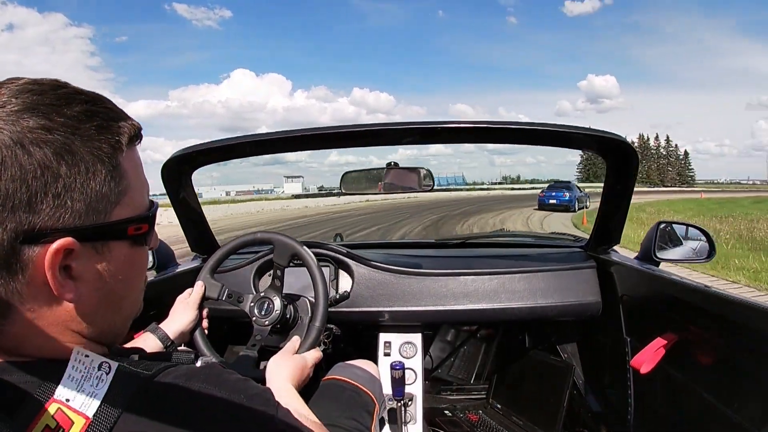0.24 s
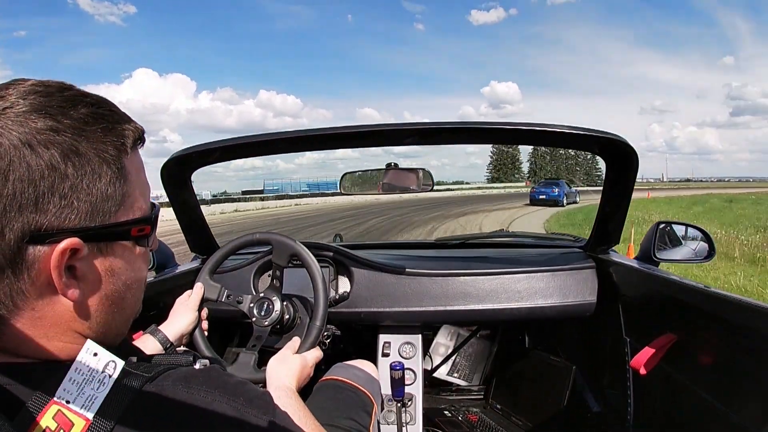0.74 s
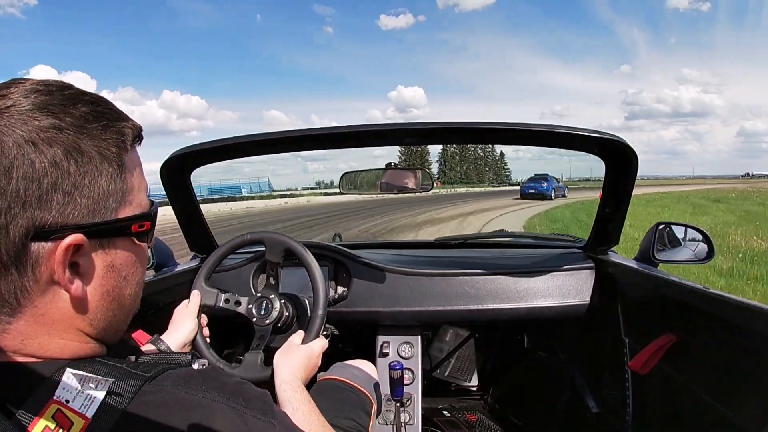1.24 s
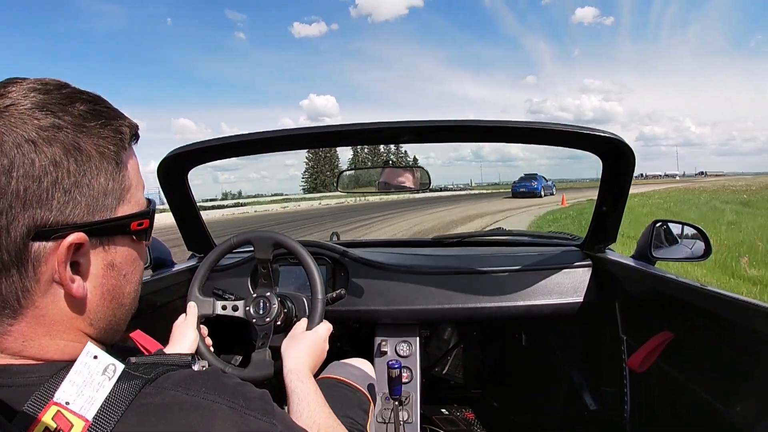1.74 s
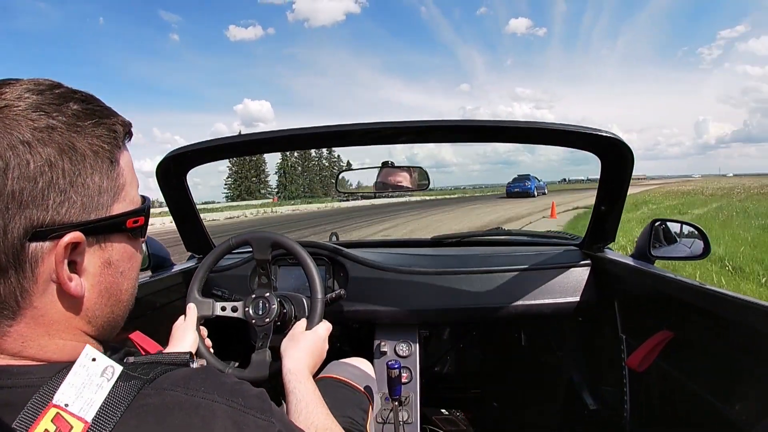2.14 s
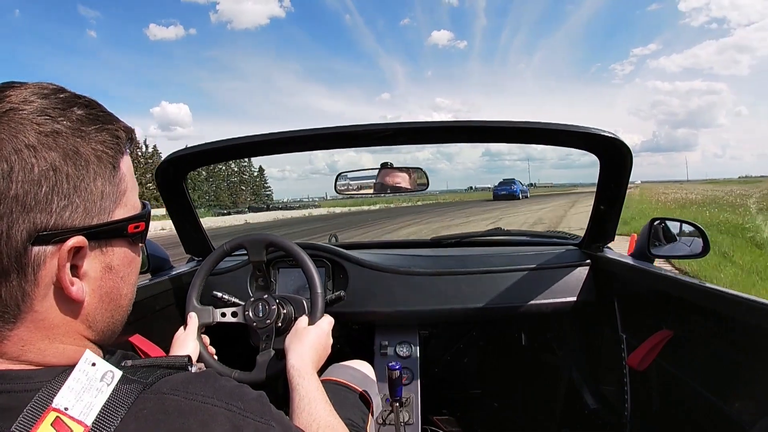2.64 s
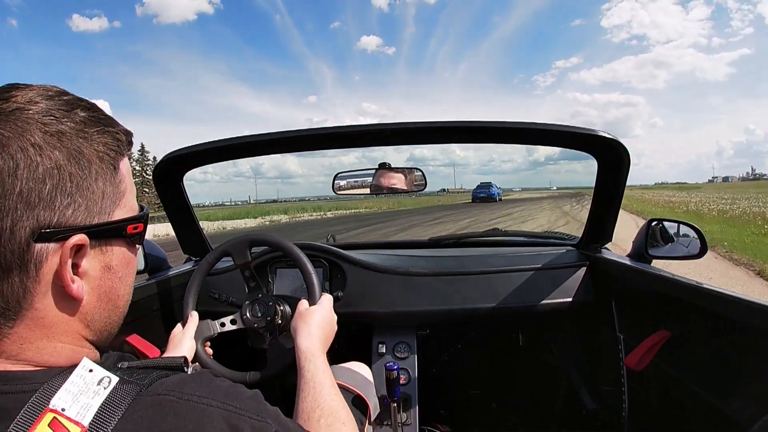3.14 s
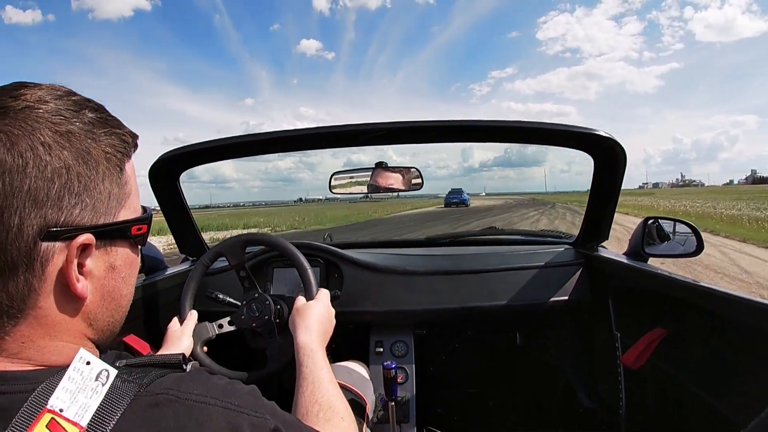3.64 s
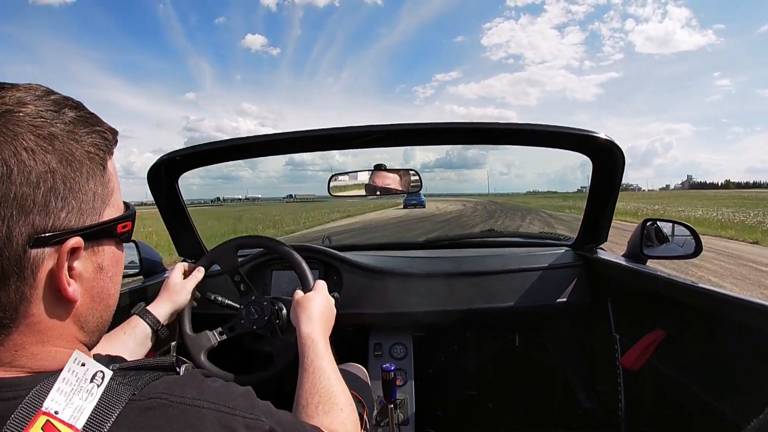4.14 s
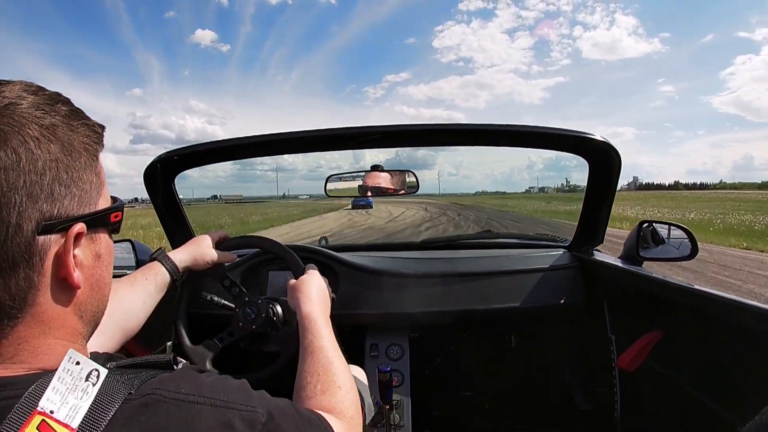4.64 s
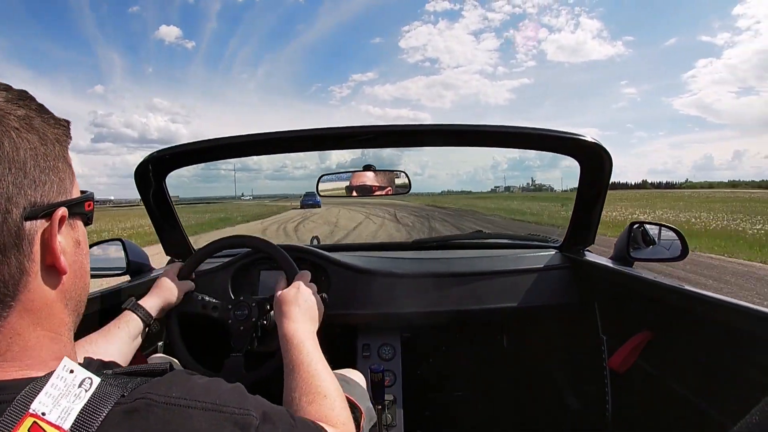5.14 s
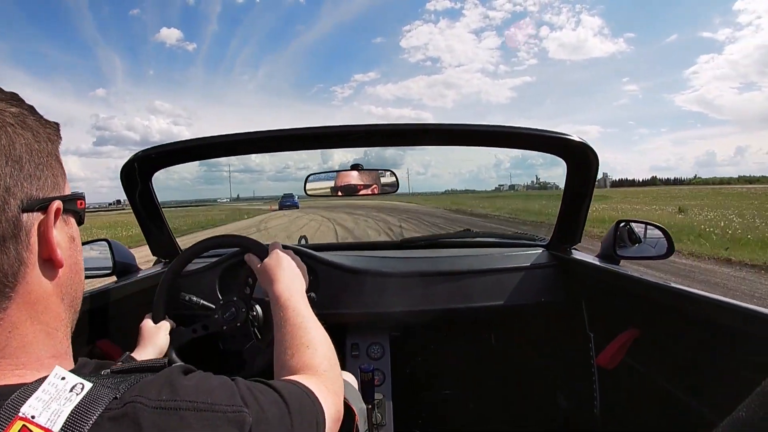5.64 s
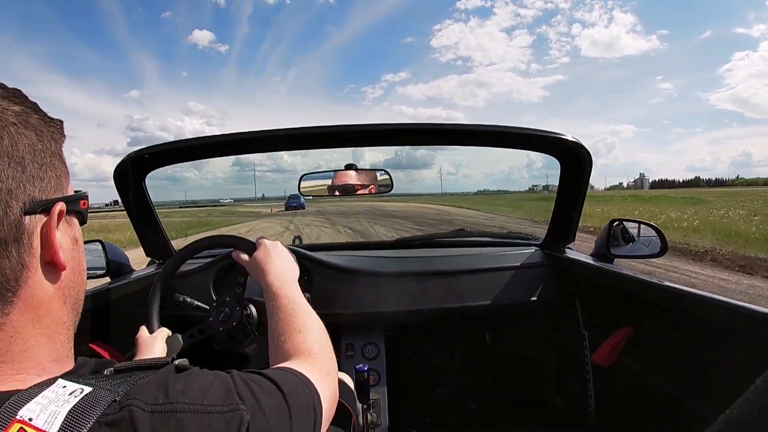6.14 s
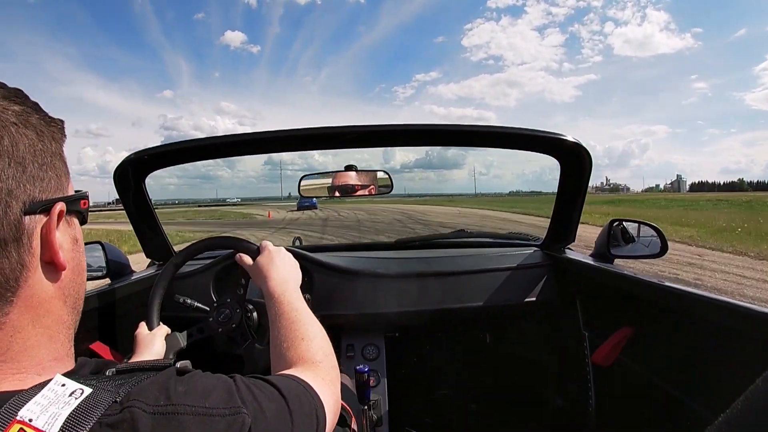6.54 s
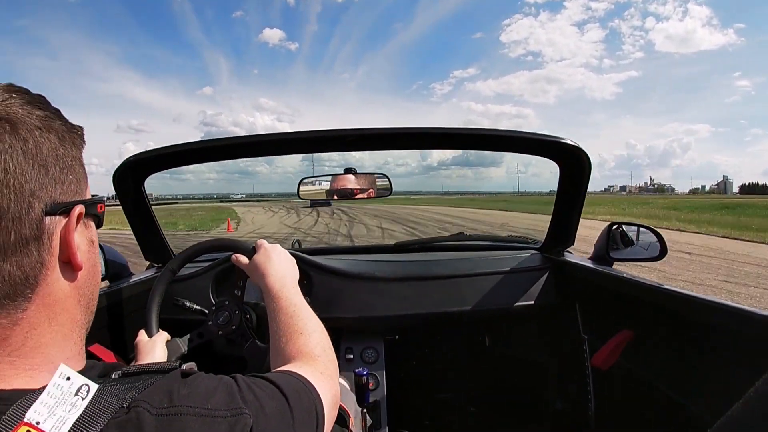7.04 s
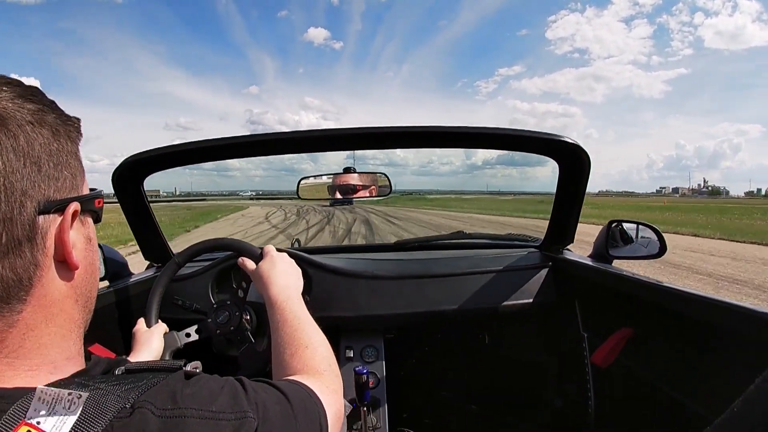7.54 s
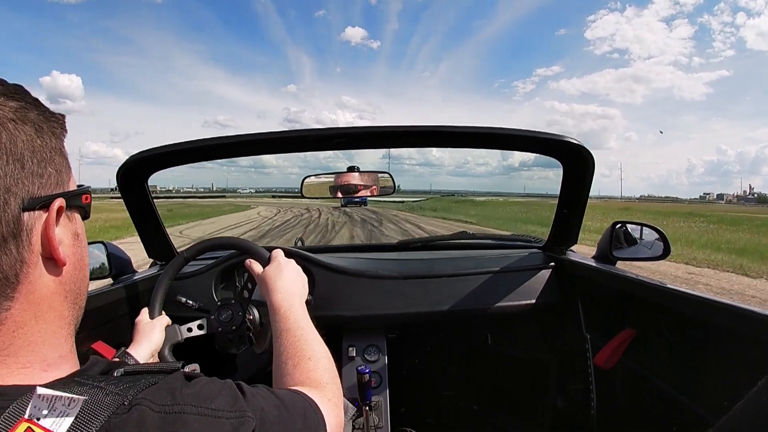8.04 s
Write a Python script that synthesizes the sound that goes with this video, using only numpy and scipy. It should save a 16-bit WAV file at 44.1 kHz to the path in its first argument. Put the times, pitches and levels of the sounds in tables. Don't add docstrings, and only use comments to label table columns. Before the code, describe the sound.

From an open cockpit, a raspy engine note rises for seven seconds, then cuts into a venting hiss, misfires, crackling pops and wind slaps.

```python
import sys
import numpy as np
from scipy import signal
from scipy.io import wavfile
from scipy.ndimage import uniform_filter1d, minimum_filter1d

SR = 44100
rng = np.random.default_rng(int(sys.argv[2]) if len(sys.argv) > 2 else 0)


def how_loud(loudness_db):
    steps = np.asarray(loudness_db, float) / 20
    return 10 ** steps


def digitize_waveform(pressure):
    field = np.atleast_2d(pressure).T
    bounded = np.clip(field, -1, 1)
    quanta = np.round(bounded * 32767).astype(np.int16)
    wavfile.write(sys.argv[1], SR, quanta)


N = 365588

# t/s, firing rate/Hz
SPEED = [(0, 54.5), (.36, 55.9), (.95, 58), (2.18, 63.6), (2.64, 65.9), (3.43, 70.2), (3.97, 73.4),
         (4.78, 79), (5.38, 83.8), (6.06, 90.3), (6.64, 95.3), (6.9, 97)]
CUT_S, COAST_LOSS_PER_S2 = 6.97, 10.5
SHUNT_HZ, SHUNT_PER_S, SHUNT_DECAY_S, SHUNT_TOP_S = 7.5, .6, .5, .13
# t/s, level/dB
EFFORT = [(0, -14), (.12, -18.5), (.18, -23.5), (.5, -16), (1.04, -19), (1.1, -19.5), (1.5, -19),
          (1.85, -16.5), (2.6, -14), (6.97, -12.5)]
FULL_DB = -14

# f/Hz, level/dB
FIRST_ORDER = [(54, -17), (62, -16.5), (75, -15), (97, -12.5)]
SECOND_ORDER = [(108, -18), (135, -15.5), (148, -20), (157, -28), (172, -20.5), (184, -19), (195, -19.5)]
THIRD_ORDER = [(160, -37), (180, -36.5), (190, -49.5), (200, -52)]
# f/Hz, lag/turns
SECOND_TRAIL = [(150, .225), (165, .14), (185, .18)]
CABIN_DELAY_S, FIRST_LEAD, THIRD_LEAD = .0068, .416, 0.18
CABIN_MODE_HZ, CABIN_MODE_LEAD = 60.7, .085
BOOM_FOLLOWS = 0.073
COAST_FIRST_DB, COAST_SECOND_DB, REOPEN_S = -22.5, -53, 0.27

# f/Hz, width/Hz, level/dB
BARK = [(225.3, 40, 0), (292, 18, -10), (326, 58, 13), (398.5, 68, 17.5), (456, 17, 8.5)]
# f/Hz, width/Hz, level/dB
SILENCER_DIPS = [(244, 5.8, -5), (193.5, 13, -6.5)]
# f/Hz, width/Hz, level/dB
COLD_DIP = [(441, 110, 0.0084)]
COLD_SHARE, WARM_HZ = 0.42, 74.8
COLD_HZ, HOT_HZ = 64, 85.4
# f/Hz, width/Hz, level/dB, slope/dB per firing rate Hz, extra slope once hot
RASP = [(560, 110, -9, -0.32, 0), (604, 88, -1.5, 0.35, -0.11), (663, 33, 6.5, 0.17, 0.063),
        (702, 37, -5.5, -0.46, 0.029)]
RING = [(844.4, 78, 4.5, 0.12, .35), (954.7, 77, 1.5, 0.1, 0.4), (1048, 31, -8.5, .1, -0.3),
        (1187, 110, -2.5, 0.17, -0.2), (1592, 150, -9, -0.018, .1), (1902, 26, -12.5, -0.1, .05)]
# firing rate/Hz, level/dB
RASP_TUNING = [(55, -24.5), (60, -25), (66, -30), (73, -33), (77, -31.5), (82, -29.5), (88, -28), (97, -31)]
# f/Hz, width/Hz, level of the cancelling path/dB
CANCELLED = [(755, 58, -3), (872, 13, -8.5), (1103, 41, -7.5), (1339, 170, 3)]
BARK_HZ, RASP_HZ, MICROPHONE_HZ = (202, 474.4), (475, 1730), 6210
UPPER_HZ = (800, 1280, 2300)
RING_DB, RING_DB_PER_HZ = -27.5, -0.33
TOP_DB, TOP_DB_PER_HZ, TOP_BEST_HZ = -40.5, -0.2921, 75
RING_FOLLOWS_FLOW = 0.32
WANDER_DB = 0.64
SCATTER_S, SCATTER_SHARE = (.0011, .0019), .5
EDGE_LEAD_S = .0028

# t/s, f/Hz
TURBO = [(0, 2100), (.55, 2400), (1, 2880), (2, 3715), (2.5, 4040), (3, 4465), (4, 5235), (5, 6130),
         (5.5, 6545), (6, 6865), (6.25, 6995), (6.6, 7060), (6.98, 7090)]
RUNDOWN_HZ, RUNDOWN_PER_S = 7050, .7
# f/Hz, level/dB
WHISTLE = [(2100, -80), (2900, -60), (3700, -60), (4100, -66), (4450, -62), (4900, -65), (5700, -64),
           (6500, -66), (6950, -63), (7100, -70)]
SHUT_WHISTLE = [(2900, -66), (3300, -60), (3700, -53), (4100, -59), (4900, -58), (5500, -53), (6000, -51),
                (7000, -53)]

# t/s, level/dB
FLOW = [(0, -61), (1.7, -48), (2.7, -53.5), (4, -54), (5.5, -49.5), (6.9, -51.5), (7, -56), (7.6, -53.5),
        (8.29, -52)]
# f/Hz, level/dB
HISS = [(900, -22), (1400, -8), (1650, 7), (2300, -14.5), (2900, -8), (3600, -9), (4300, -22.5), (5800, -4),
        (6600, -19), (7800, -24), (9000, -17), (11000, -23.5)]
# f/Hz, width/Hz, level/dB
DUCT = [(2880, 330, 0), (3570, 360, 1.5), (4270, 200, -6)]
SHUT_DUCT = [(3080, 490, 7)]
# f/Hz, width/Hz, level/dB
SEALS = [(3590, 300, -.5), (7400, 550, -16.5), (8500, 600, -22.5)]
SEAL_DB, SEAL_DB_PER_HZ = -59, -0.1858
RUSH_DB, RUSH_RISE_S, RUSH_FADE_DB_PER_S = -37.5, 0.23, 5.5
SLIPSTREAM_DB = -67

# t/s, peak level/dB
GUSTS = [(0.093, -16.5), (0.324, -26), (0.715, -32), (1.008, -24), (1.107, -24.5), (1.236, -26),
         (1.37, -25), (1.587, -22.5), (2.048, -26), (2.138, -25), (2.433, -35), (4.593, -32), (4.914, -32),
         (5.065, -30), (5.219, -22), (6.064, -20.5), (6.191, -26), (6.575, -24), (6.722, -22), (6.817, -25),
         (6.992, -27), (7.12, -17.5), (7.209, -25), (7.35, -24), (7.42, -22.5), (7.514, -19.5),
         (7.669, -18), (7.802, -16.5), (8.008, -17.5), (8.189, -19)]
# t/s, level/dB
LULL = [(0, -28), (1.6, -38), (2.6, -33.5), (4, -34.5), (5, -29), (6.9, -37), (7.05, -29), (8.29, -26.5)]
# f/Hz, level/dB per Hz
WIND = [(12, -24), (22, -3), (50, -2), (100, -2), (250, -8), (400, -17), (700, -27), (1500, -44),
        (2500, -58)]
GUST_RISE_S, GUST_FALL_S, GUST_DB = 0.017, 0.06, -6
# t/s, peak level/dB, brightness/dB, t60/s
SLAPS = [(0.077, -6, -33, 0.063), (0.255, -13, -30, 0.063), (0.775, -24, -27, 0.04), (3.17, -14, -31, 0.11),
         (1.049, -23, -16, 0.024), (7.41, -21, -6.5, 0.073), (7.438, -4, -26, 0.017),
         (7.482, -13, -26, 0.035), (7.546, -9, -27, 0.059), (7.562, -14, -12, 0.029),
         (7.573, -9, -38, 0.049), (7.653, -9, -32, 0.04), (7.672, -2, -21, 0.038), (7.727, -15, -14, 0.2),
         (7.785, -16, -14, 0.043), (7.75, -28, -38, 0.12), (7.869, -16, -30, 0.11),
         (7.979, -12, -14, 0.064), (8.012, -11.5, -10, 0.03), (8.06, -24, -4, 0.048),
         (8.034, -17, -32, 0.025), (8.085, -7, -23, 0.054), (8.141, 1.5, -40, 0.024),
         (8.235, -29, -13, 0.073)]

TICK = (1.73, -31)
# f/Hz, width/Hz, level/dB
GRIT_MODES = [(4570, 370, -3), (5530, 280, 6), (8000, 160, 7), (9200, 500, -2)]

HIGH_STARTS_HZ, HIGH_ENDS_S, HIGH_BAND_HZ = 4400, 7.57, (12000, 14300)
HIGH_DB, HIGH_BURST_DB, HIGH_BURST_S = -56, -36, .05
LURCH_DB, LURCH_S = -22, 0.27

# f/Hz, level/dB
VENT_HISS = [(2000, -31), (2800, 7), (4500, 5.5), (5800, -5.5), (7200, 4), (9000, -4.5), (11000, -26),
             (13000, -28), (14500, -6)]
VENT_S = 7.026
VENT_HOLD_S, VENT_DB, VENT_FADE_DB_PER_S, CRACK_DB = 0.35, -44, 49, -44.5

# t/s, peak level/dB
MISFIRES = [(6.98, -4.5), (7.001, -7), (7.052, -22), (7.086, -6.5), (7.126, -5.5), (7.145, -4.5),
            (7.167, -9), (7.177, -6), (7.187, -11), (7.209, -7.5), (7.219, -12), (7.242, -13.5),
            (7.252, -26), (7.264, -16), (7.287, -16.5), (7.327, -37)]
# t/s, peak level/dB, half-width/ms, push (+) or pull (-)
POPS = [(7.304, -5, 0.99, 0.73), (7.451, -2, 0.68, 0.29), (7.562, -11, 1.2, -1), (7.574, -1.5, 0.84, 0.96),
        (7.578, -5, 0.83, 0.92), (7.583, -11, 0.43, 1), (7.665, -9, 0.74, 0.83), (7.691, -5, 0.71, 0.34),
        (7.696, -9, 0.61, -1.1), (7.724, -5, 1.1, 0.84), (7.751, -10, 0.7, -1), (7.788, -10, 0.36, 0.84),
        (7.805, -7.5, 0.72, -1), (7.878, -5, 0.53, 0.82), (8.034, -4.5, 0.89, 0.79), (8.048, -9, 0.4, 0.92),
        (8.1, -5, 0.85, 0.79), (8.139, -1.5, 0.52, 0.82), (8.145, -12, 0.42, 0.55), (8.186, -12, 1.1, 0.23),
        (8.186, -2.5, 0.97, -1), (8.244, -23, 0.81, -0.87), (8.252, -12, 0.97, 0.97)]
CRACKLE_DB = -16
# t/s, peak level/dB
BURBLES = [(7.364, -23), (7.429, -18.5), (7.466, -30), (7.485, -23), (7.517, -29), (7.538, -24),
           (7.556, -20), (7.576, -18), (7.615, -33), (7.64, -27), (7.673, -21), (7.718, -17), (7.745, -19),
           (7.8, -20), (7.825, -24), (7.844, -30), (7.874, -28), (7.956, -20), (8.029, -23), (8.095, -22.5),
           (8.142, -27), (8.167, -25)]
# f/Hz, width/Hz, level/dB
BURBLE_MODES = [(620, 100, 2), (886, 200, 5), (1200, 360, -9)]
BURBLE_DB = -8

CEILING, LIMIT_S = .88, .006


def rms_one(x):
    return x / np.sqrt(np.mean(x ** 2) + 1e-20)


def evened(x, span_s=.5):
    return x / np.sqrt(uniform_filter1d(x ** 2, int(span_s * SR)) + 1e-12)


def in_time(rows):
    s, *columns = np.transpose(rows)
    return [np.interp(np.arange(N) / SR, s, c) for c in columns]


def at_hz(points, hz):
    return np.interp(hz, *np.transpose(points))


def lowpass_3(x, corner_hz, kind="low"):
    return signal.sosfilt(signal.butter(3, corner_hz, kind, fs=SR, output="sos"), x)


def band(x, low_hz, high_hz):
    return signal.sosfilt(signal.butter(2, [low_hz, high_hz], "band", fs=SR, output="sos"), x)


def drift(rate):
    r = np.exp(-40 * np.pi * rate / SR)
    white = rng.standard_normal(N // 20 + 2002)
    slow = signal.lfilter([1], [1, -2 * r, r * r], white)[2000:]
    return np.interp(np.arange(N) / 20, np.arange(len(slow)), rms_one(slow))


def clicks(times, sizes):
    out = np.zeros(N + 2)
    at = np.clip(np.asarray(times) * SR, 0, N)
    np.add.at(out, at.astype(int), sizes * (1 - at % 1))
    np.add.at(out, at.astype(int) + 1, sizes * (at % 1))
    return out[:N]


def clock():
    t = np.arange(N) / SR
    return t, np.maximum(t - CUT_S, 0)


def shaft():
    t, since = clock()
    shunt = SHUNT_PER_S * np.exp(-t / SHUNT_DECAY_S) * np.cos(2 * np.pi * SHUNT_HZ * (t - SHUNT_TOP_S))
    return in_time(SPEED)[0] + shunt - COAST_LOSS_PER_S2 * since


def spool_hz():
    since = clock()[1]
    return np.where(since > 0, RUNDOWN_HZ * np.exp(-RUNDOWN_PER_S * since), in_time(TURBO)[0])


def resonate(x, modes, wander_db=0.):
    out = 0
    faster = shaft() - 70 if wander_db else 0
    for hz, width, level_db, *slope_db in modes:
        r = np.exp(-np.pi * width / SR)
        if wander_db:
            hotter = np.maximum(faster + 70 - HOT_HZ, 0)
            level_db = level_db + slope_db[0] * faster + slope_db[1] * hotter + wander_db * drift(1.7)
        poles = [1, -2 * r * np.cos(2 * np.pi * hz / SR), r * r]
        out = out + how_loud(level_db) * signal.lfilter([1 - r, 0, r - 1], poles, x + 1e-18)
    return out


def coloured(spectrum, patchy_db, flicker):
    hz, level_db = np.transpose(spectrum)
    out, together, white = 0, drift(flicker), rng.standard_normal((2, N))
    count = int(2.5 * np.log2(hz[-1] / hz[1])) + 2
    edges = np.geomspace(max(hz[1] * .7, 14), min(hz[-1], 15500), count)
    for k, (low, high) in enumerate(zip(edges, edges[1:])):
        at_db = np.interp(np.log(low * high) / 2, np.log(hz), level_db)
        swell_db = patchy_db * (together + .5 * drift(flicker))
        out = out + how_loud(at_db + swell_db) * band(white[k % 2], low, high)
    return rms_one(out)


def scattered(x):
    for lag_s in SCATTER_S:
        taps = np.zeros(int(lag_s * SR) + 1)
        taps[[0, -1]] = 1, -SCATTER_SHARE
        x = signal.lfilter(taps[::-1], taps, x + 1e-18)
    return x


def bark_of(pulses):
    stored = signal.lfilter([1], [1, -.995], pulses)
    heat = np.clip((shaft() - COLD_HZ) / (HOT_HZ - COLD_HZ), -.1, 1.2)
    rung = resonate(stored, BARK[:-1]) + heat * resonate(stored, BARK[-1:])
    rung = rung - np.clip((WARM_HZ - shaft()) / 10, 0, COLD_SHARE) * resonate(rung, COLD_DIP)
    for dip in SILENCER_DIPS:
        rung = rung - resonate(rung, [dip])
    return signal.sosfilt(signal.ellip(3, 1, 45, BARK_HZ, "band", fs=SR, output="sos"), rung)


def rasp_of(pulses, *levels_db):
    soft = lowpass_3(pulses, 1900)
    rung = 0
    for level_db, modes, top_hz in zip(levels_db, (RASP, RING[:4], RING[4:]), UPPER_HZ):
        part = band(resonate(soft, modes, WANDER_DB), *RASP_HZ)
        rung = rung + how_loud(level_db) * rms_one(band(part, 550, top_hz))
    for dip in CANCELLED:
        rung = rung - resonate(rung, [dip])
    return rung


def pipe_levels():
    effort_db, per_s = in_time(EFFORT)[0] - FULL_DB, shaft()
    flow_db = RING_FOLLOWS_FLOW * (in_time(FLOW)[0] + 53)
    rasp_db = 0.17 * effort_db + at_hz(RASP_TUNING, per_s)
    ring_db = RING_DB + 0.12 * effort_db + flow_db + RING_DB_PER_HZ * (per_s - 70)
    return rasp_db, ring_db, TOP_DB + TOP_DB_PER_HZ * np.abs(per_s - TOP_BEST_HZ)


def cabin_boom(turns):
    per_s, since = shaft(), clock()[1]
    fade = np.clip(1 - since / 0.048, 0, 1)
    reopen = np.clip(since / REOPEN_S - .3, 0, 1)
    load = how_loud(BOOM_FOLLOWS * (in_time(EFFORT)[0] - FULL_DB)) * fade
    first = load * how_loud(at_hz(FIRST_ORDER, per_s)) + reopen * how_loud(COAST_FIRST_DB)
    second = load * how_loud(at_hz(SECOND_ORDER, 2 * per_s)) + reopen * how_loud(COAST_SECOND_DB - 10.0 * since)
    third = load * how_loud(at_hz(THIRD_ORDER, 3 * per_s))
    early = CABIN_MODE_LEAD / (1 + np.exp((per_s - CABIN_MODE_HZ) / 1.6))
    late = turns - CABIN_DELAY_S * per_s + FIRST_LEAD + early
    boom = first * np.cos(2 * np.pi * late)
    boom = boom + second * np.cos(4 * np.pi * (late - at_hz(SECOND_TRAIL, 2 * per_s)))
    return np.sqrt(2) * (boom + third * np.cos(6 * np.pi * (late - THIRD_LEAD)))


def engine(sharpness=14.4, uneven_db=0.58, jitter_s=.00004):
    t = clock()[0]
    lit = np.clip((CUT_S - t) / .004, 0, 1)
    turns = .9 + np.cumsum(shaft() + .3 * drift(5)) / SR
    luck = rng.standard_normal((700, 3))
    shape = np.exp(sharpness * (np.cos(2 * np.pi * turns) - 1))
    puffs = how_loud(uneven_db * luck[np.round(turns).astype(int), 0]) * shape
    count = np.arange(1, int(turns[-1]))
    edge_s = np.interp(count, turns, t) - EDGE_LEAD_S + jitter_s * luck[count, 1]
    edges = clicks(edge_s, how_loud(0.5 * luck[count, 2]))
    bark = how_loud(in_time(EFFORT)[0]) * evened(bark_of(puffs))
    rasp = rasp_of(scattered(edges), *pipe_levels())
    return cabin_boom(turns) + lit * (bark + rasp), turns


def turbo():
    hz = spool_hz()
    level_db = np.where(clock()[1] > .06, at_hz(SHUT_WHISTLE, hz), at_hz(WHISTLE, hz))
    level_db = level_db + 2.2 * drift(14) + 1.0 * drift(4) - 1.5
    phase = 2 * np.pi * np.cumsum(hz + 18 * drift(60)) / SR
    return np.sqrt(2) * how_loud(level_db) * np.sin(phase)


def gas_roar(beat, roar_db=-9.5):
    since = clock()[1]
    rush_db = RUSH_DB - RUSH_FADE_DB_PER_S * since - 5.1 * np.clip(1 - since / RUSH_RISE_S, 0, 1)
    slow_db = np.clip(2.2 * (64 - shaft()), 0, 3)
    levels_db = [np.where(since > 0, rush_db + shut_db, open_db + roar_db - slow_db)
                 for open_db, shut_db in zip(pipe_levels(), (0, 0, -13))]
    return rasp_of(beat ** 2 * rng.standard_normal(N), *levels_db)


def intake_hiss(beat):
    t, since = clock()
    hiss = how_loud(in_time(FLOW)[0] + 3.6) * beat ** .6 * coloured(HISS, patchy_db=.5, flicker=14)
    shut = np.clip(since / 0.57, 0, 1)
    hiss = 1.15 * hiss + resonate(hiss, DUCT) + shut * resonate(hiss, SHUT_DUCT)
    throttle = np.interp(t, [7.4, 7.7], [1, .45])
    bright = (spool_hz() / 7000) ** 1.4 * throttle
    return lowpass_3(hiss, 4300) + bright * lowpass_3(hiss, 4300, "high")


def seal_chatter(turns):
    gate = np.exp(.8 * np.cos(2 * np.pi * (turns - .1)))
    level = how_loud(SEAL_DB + SEAL_DB_PER_HZ * (shaft() - 59.5)) * (clock()[1] == 0)
    return level * rms_one(resonate(gate * rng.standard_normal(N), SEALS))


def air(turns, puff=.3):
    depth = np.clip(puff + .025 * (68 - shaft()), puff, .8)
    beat = 1 + depth * np.cos(2 * np.pi * (turns - .03))
    slipstream = how_loud(SLIPSTREAM_DB) * rms_one(band(rng.standard_normal(N), 4800, 10000))
    return gas_roar(beat) + intake_hiss(beat) + seal_chatter(turns) + slipstream


def buffeting():
    t, level = clock()[0], how_loud(in_time(LULL)[0])
    for s, peak_db in GUSTS:
        age = t - s - GUST_RISE_S
        spread_s = np.where(age < 0, GUST_RISE_S / 2, GUST_FALL_S)
        level = np.maximum(level, how_loud(peak_db + GUST_DB) * np.exp(-.5 * (age / spread_s) ** 2))
    return how_loud(8.5) * level * coloured(WIND, patchy_db=1.6, flicker=20)


def slaps():
    white, out = rng.standard_normal((2, N)), np.zeros(N)
    dull = rms_one(band(band(white[0], 80, 830), 80, 840))
    edge = rms_one(band(band(white[1], 550, 2300), 500, 3200))
    for s, peak_db, bright_db, t60 in SLAPS:
        i = int(s * SR)
        age = np.arange(min(SR // 4, N - i)) / SR
        shape = (1 - np.exp(-age / 0.0084)) * how_loud(-60 * age / max(t60, .01))
        bright = how_loud(bright_db) * (1 + 2.5 * np.exp(-age / 0.0034)) * how_loud(-150 * age)
        part = slice(i, i + len(age))
        out[part] += how_loud(peak_db - 1.5) * shape * (dull[part] + bright * edge[part])
    return out


def grit():
    ring = resonate(clicks([TICK[0]], 1.), GRIT_MODES)
    return how_loud(TICK[1]) * ring / np.abs(ring).max()


def high_hiss():
    t = clock()[0]
    blow = (t > VENT_S) * np.exp(-np.maximum(t - VENT_S, 0) / HIGH_BURST_S)
    spurts = .6 * np.exp(-np.abs(t - CUT_S) / .015) + blow
    sounding = np.clip((spool_hz() - HIGH_STARTS_HZ) / 100, 0, 1) * (t < HIGH_ENDS_S)
    steady = how_loud(HIGH_DB + 1.5 * drift(15)) * (spool_hz() / 7000) ** 2.5 * sounding
    return (steady + how_loud(HIGH_BURST_DB) * spurts) * rms_one(band(rng.standard_normal(N), *HIGH_BAND_HZ))


def lurch():
    thump = rms_one(band(band(rng.standard_normal(N), 22, 79), 13, 70))
    return how_loud(LURCH_DB) * np.exp(-.5 * ((clock()[0] - 7.03) / LURCH_S) ** 2) * thump


def vent():
    t = clock()[0]
    age = t - VENT_S
    crack = how_loud(CRACK_DB) * np.exp(-np.abs(t - CUT_S - .01) / 0.021)
    blow_db = VENT_DB - 3.0 * age - VENT_FADE_DB_PER_S * np.maximum(age - VENT_HOLD_S, 0)
    blow = how_loud(blow_db) * np.clip(age / 0.0072 + 1, 0, 1)
    return (crack + blow) * coloured(VENT_HISS, patchy_db=1.8, flicker=16.0)


def misfires(puff_s=0.00038):
    s, peak_db = np.transpose(MISFIRES)
    puff = np.exp(-.5 * (np.arange(-88, 89) / SR / puff_s) ** 2)
    bark = bark_of(np.convolve(clicks(s, how_loud(peak_db)), puff)[44:N + 44])
    edges = scattered(clicks(s + .002, how_loud(peak_db)))
    bark = bark + how_loud(38.5) * band(resonate(edges, RASP + RING), *RASP_HZ)
    bark = bark + how_loud(30) * band(edges, 600, 1400)
    return how_loud(peak_db.max()) * bark / np.abs(bark).max()


def pops():
    out, age_ms = np.zeros(N + SR), np.arange(-200, 201) / SR * 1000
    for s, peak_db, width_ms, way in POPS:
        i = int(s * SR)
        out[i - 200:i + 201] += way * how_loud(peak_db) * np.exp(-(age_ms / width_ms) ** 2)
    tail = signal.lfilter([.012], [1, -.994], np.abs(out[:N]))
    crackle = how_loud(CRACKLE_DB - 3.0) * tail * rms_one(band(rng.standard_normal(N), 360, 960))
    return signal.sosfilt(signal.butter(1, 90, "high", fs=SR, output="sos"), out[:N]) + crackle


def burbles():
    s, peak_db = np.transpose(BURBLES)
    fires = clicks(s + 0.001035, how_loud(peak_db) * rng.choice([-1, 1], len(s)))
    rung = resonate(scattered(fires), BURBLE_MODES)
    rung = band(band(rung, 350, 1900), 300, 2400)
    return how_loud(peak_db.max() + BURBLE_DB) * rung / np.abs(rung).max()


def scene():
    note, turns = engine()
    pull = note + turbo() + air(turns) + buffeting() + slaps() + grit() + high_hiss()
    overrun = lurch() + vent() + misfires() + pops() + burbles()
    return (pull + overrun)[None]


def top_cut(x):
    return signal.sosfilt(signal.butter(12, 15550, fs=SR, output="sos"), x)


def record(dry):
    x, span = 1.456 * np.tanh(dry / 1.234), int(LIMIT_S * SR)
    gain = CEILING / np.maximum(np.abs(x), CEILING)
    x = x * uniform_filter1d(minimum_filter1d(gain, 2 * span), span)
    n = np.arange(N)
    fade_out = np.clip((N - n) / (.004 * SR), .2, 1)
    fade_in = np.sin(np.clip(n / (.002 * SR), 0, np.pi / 2)) ** 2
    x = x * fade_out * fade_in
    x = np.pad(x, ((0, 0), (SR // 10, 0)), "edge")
    body = signal.sosfilt(signal.cheby1(6, 1, MICROPHONE_HZ, fs=SR, output="sos"), x)
    top = signal.sosfilt(signal.cheby2(10, 50, 11400, fs=SR, output="sos"), band(x, 5500, 9500))
    highest = signal.sosfilt(signal.ellip(5, 1, 60, HIGH_BAND_HZ, "band", fs=SR, output="sos"), x)
    mix = body + how_loud(-6.5) * top + how_loud(-26.0) * highest
    return top_cut(mix[:, -N:])


dry = scene()
out = record(dry)
digitize_waveform(out)
```